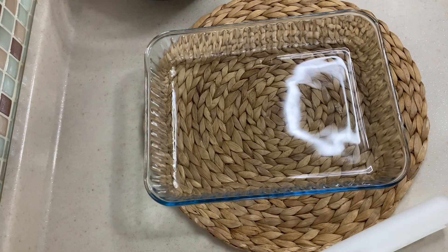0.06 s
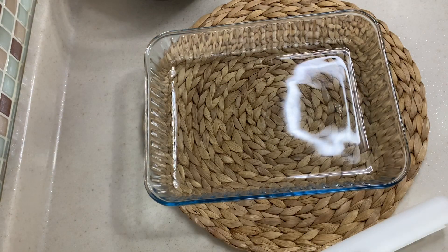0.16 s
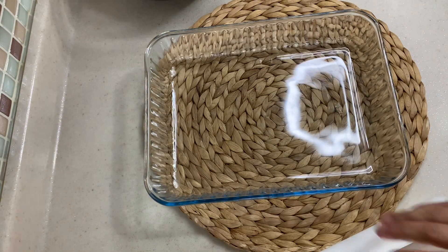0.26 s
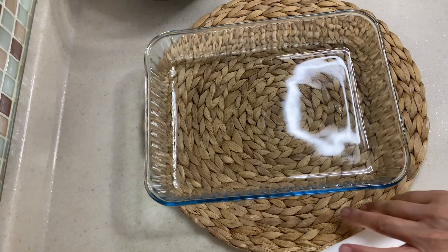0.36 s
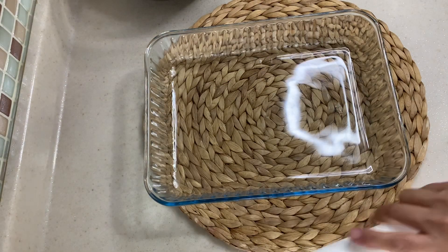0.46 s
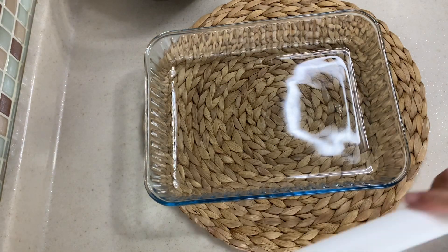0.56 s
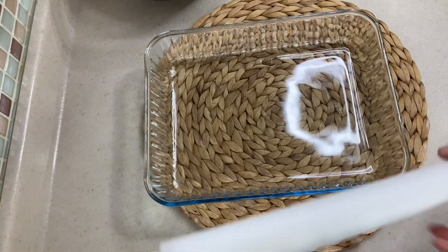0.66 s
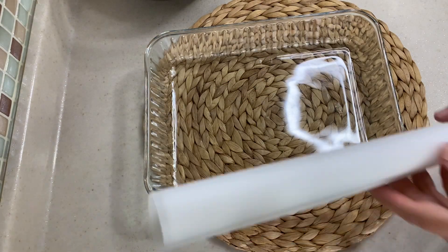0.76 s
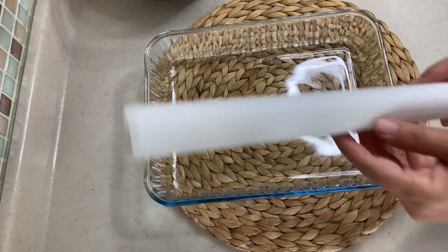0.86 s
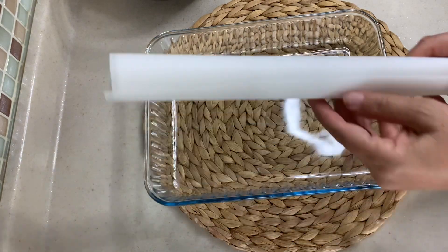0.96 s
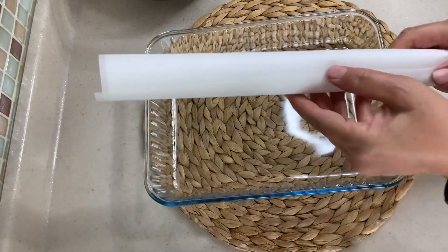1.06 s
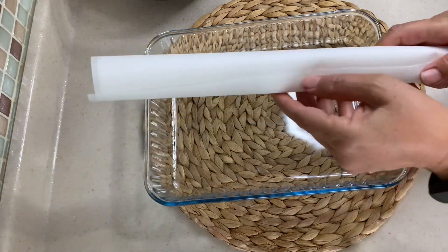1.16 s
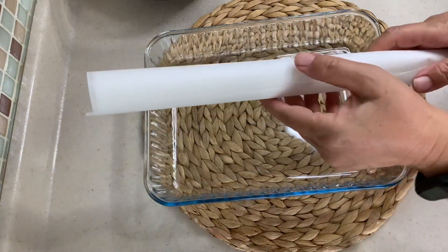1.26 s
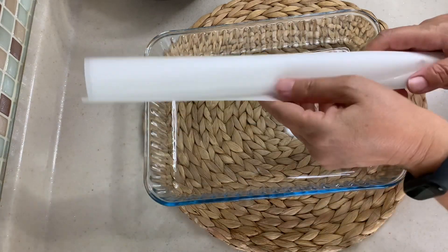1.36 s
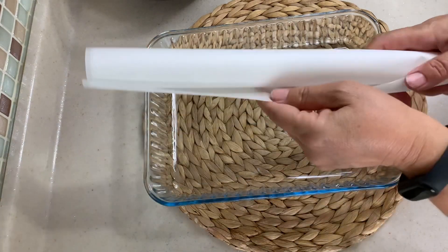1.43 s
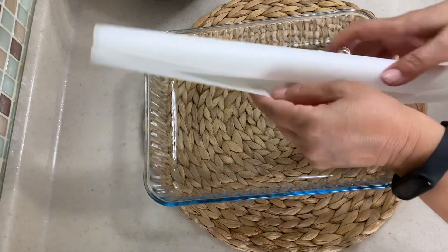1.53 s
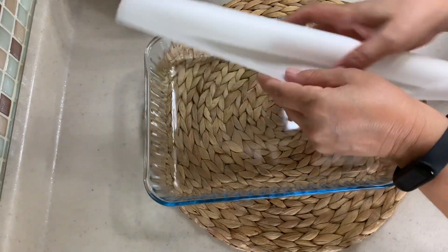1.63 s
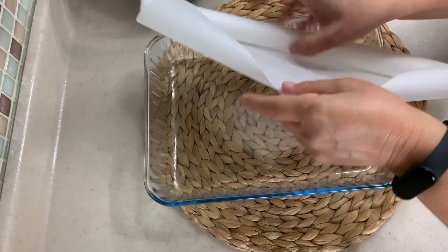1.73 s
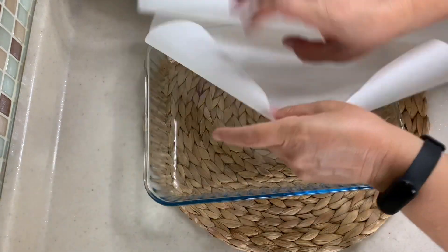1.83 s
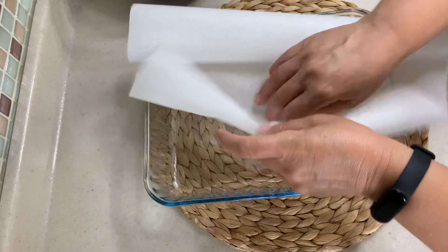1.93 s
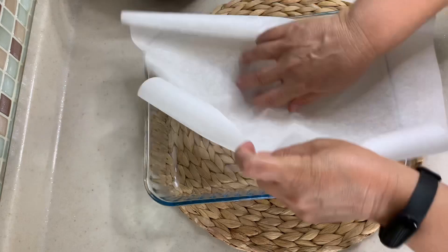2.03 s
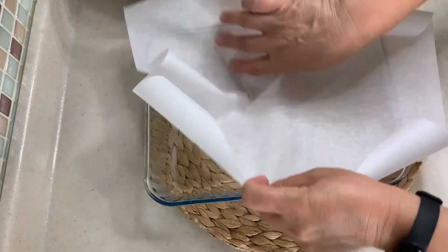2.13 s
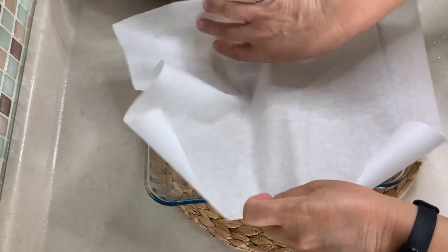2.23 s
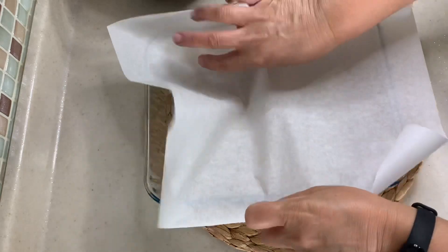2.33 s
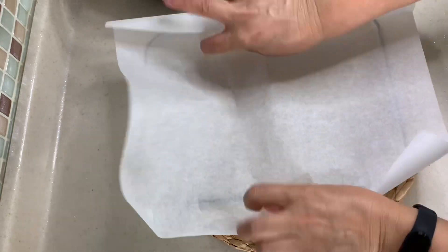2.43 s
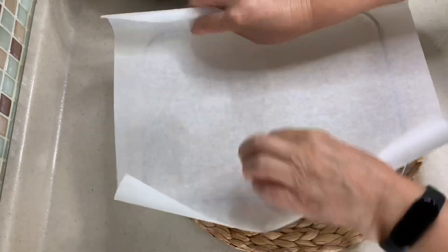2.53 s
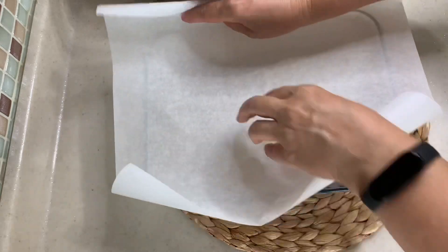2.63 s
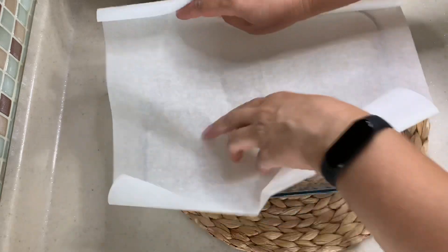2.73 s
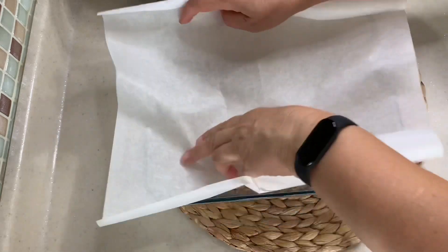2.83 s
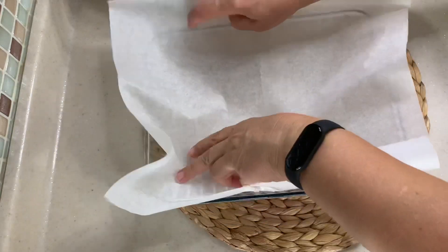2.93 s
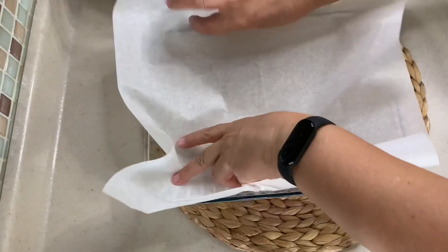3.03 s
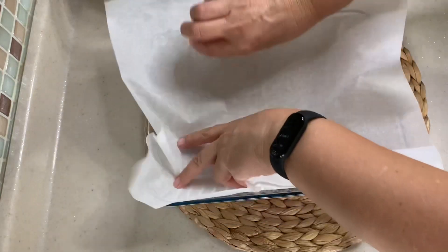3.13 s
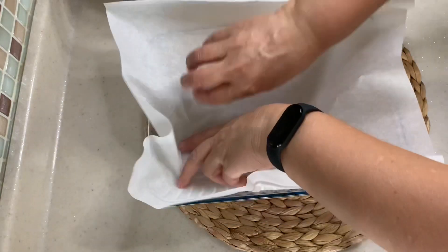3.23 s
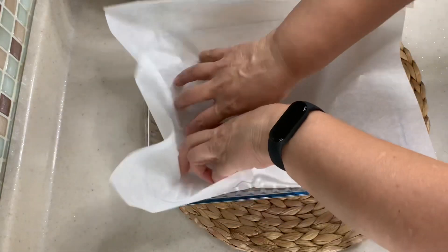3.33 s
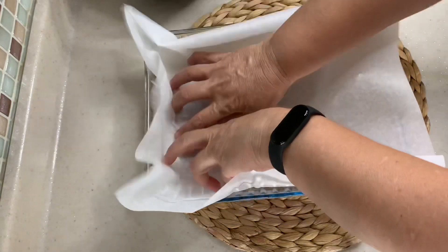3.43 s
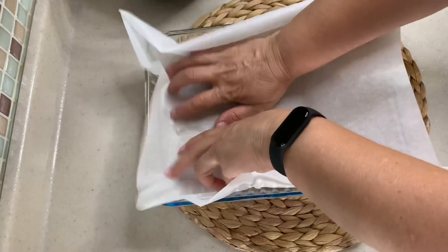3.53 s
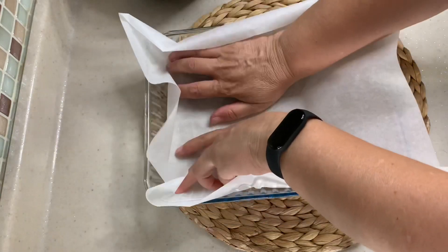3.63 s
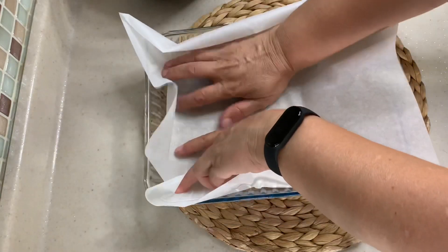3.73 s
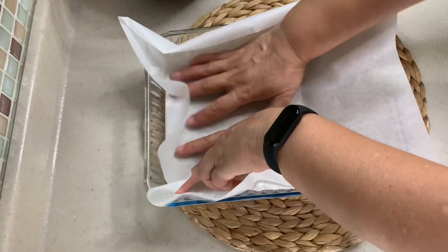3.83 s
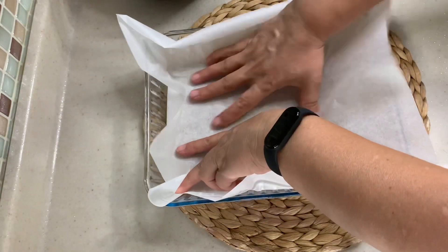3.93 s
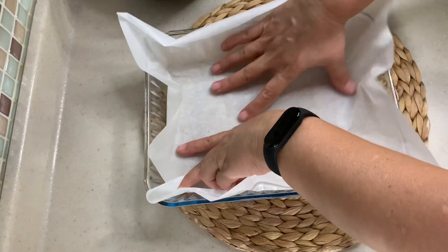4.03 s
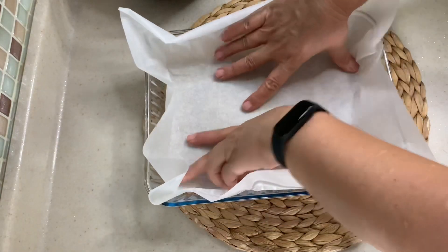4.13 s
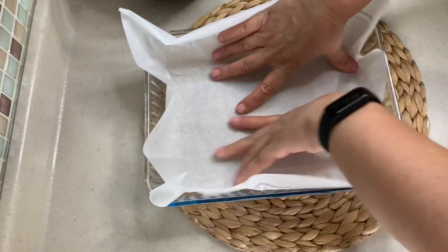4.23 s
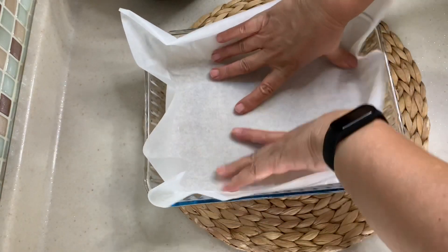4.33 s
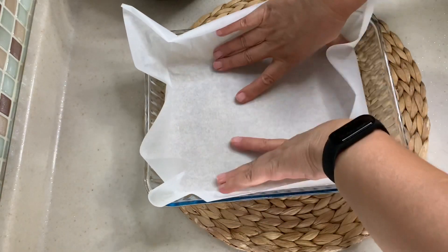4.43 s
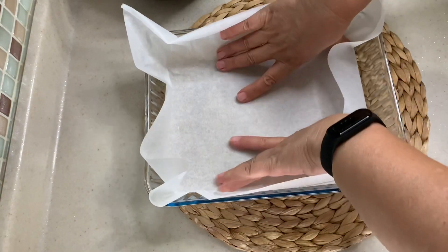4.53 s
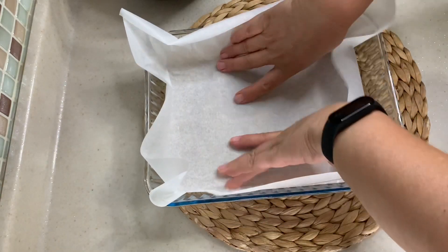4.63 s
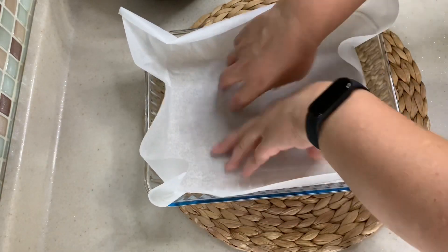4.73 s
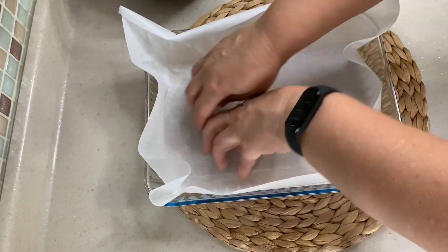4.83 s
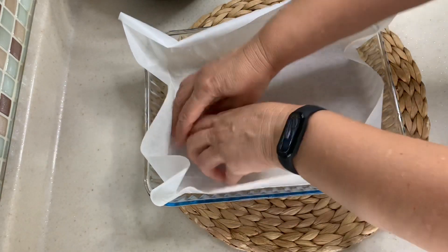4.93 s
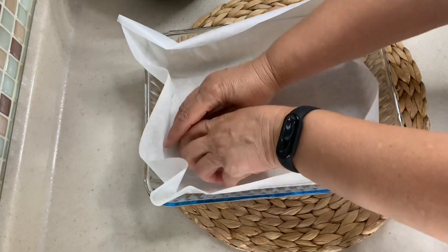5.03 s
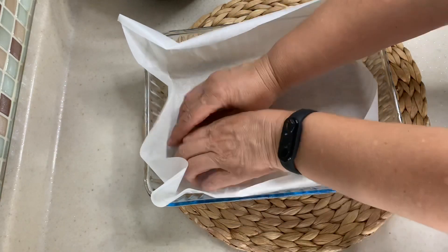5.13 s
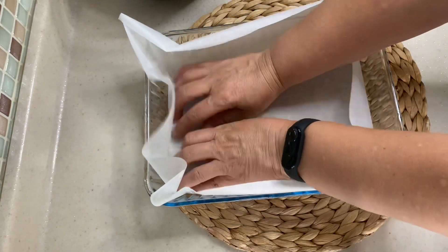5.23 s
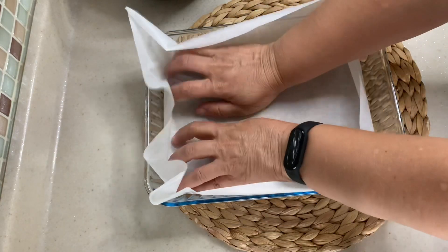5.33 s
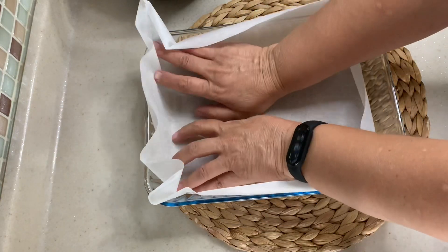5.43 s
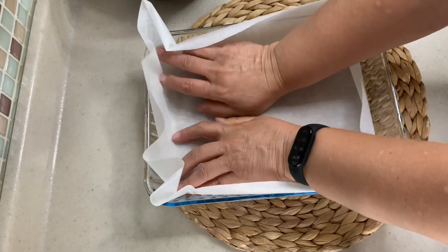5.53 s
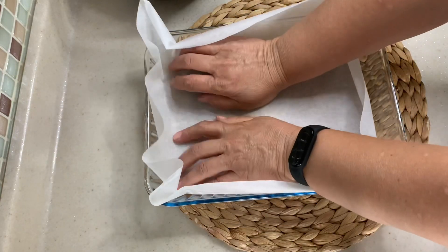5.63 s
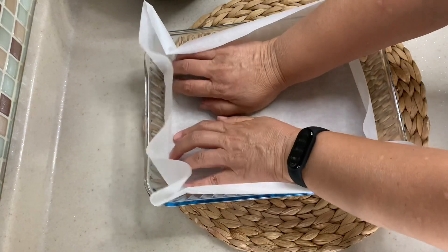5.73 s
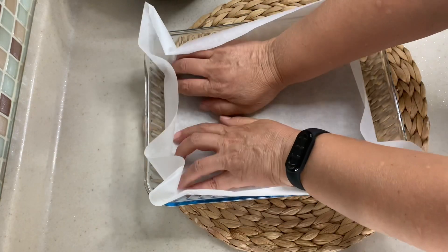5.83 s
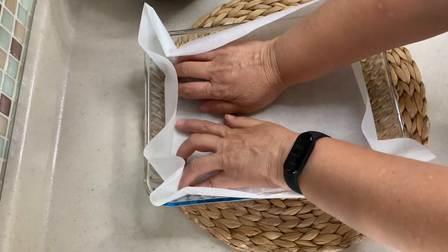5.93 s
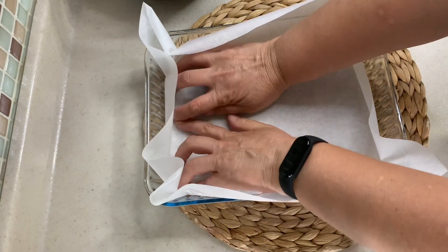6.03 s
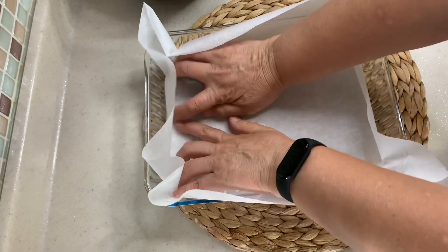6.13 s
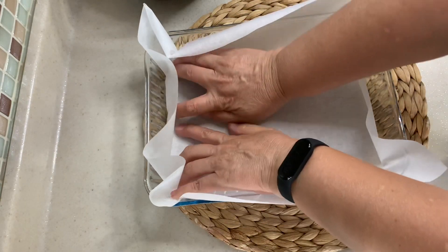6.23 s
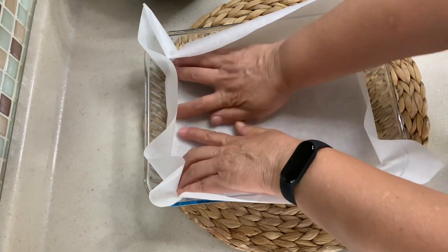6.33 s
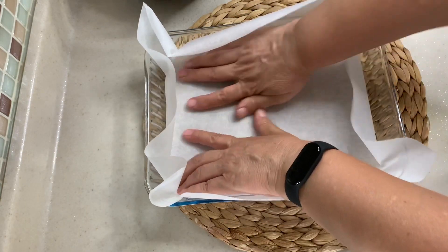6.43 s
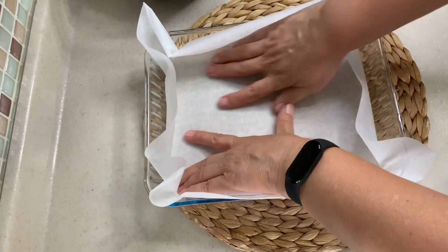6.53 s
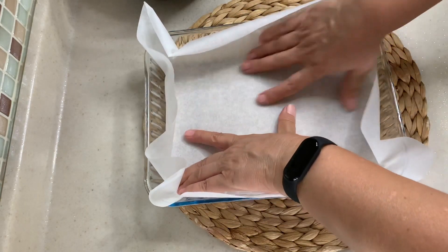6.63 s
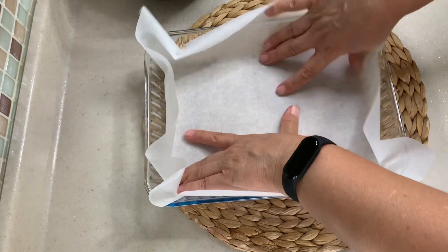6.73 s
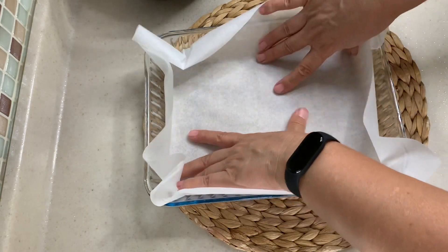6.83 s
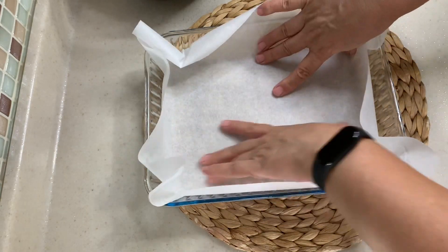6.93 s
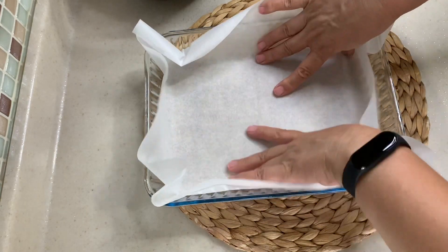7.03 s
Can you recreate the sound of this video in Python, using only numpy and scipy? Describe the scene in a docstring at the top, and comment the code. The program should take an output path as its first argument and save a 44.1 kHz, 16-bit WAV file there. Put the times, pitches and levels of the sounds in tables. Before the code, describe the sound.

Crisp paper crinkling, sharp crease snaps and soft smoothing rustles close up in a quiet kitchen, with a low steady hum behind.

```python
"""From the start an appliance hums in a quiet kitchen while hands hold a sheet of baking parchment.
From 0.4 s creases snap as bursts of noise and set facets ringing; a soft knuckle thud rings one low mode.
Then hands unroll the sheet and press it into a glass dish: noise bands rustle in clumped grains.
At 4.8 s a fingertip squeaks as a few short tones; more soft thuds follow from 6.2 s.
A pair of microphones listens from above, with close reflections around the sheet."""
import sys
import numpy as np
from scipy import signal
from scipy.fft import rfft, irfft
from scipy.io import wavfile

SR = 44100
rng = np.random.default_rng(int(sys.argv[2]) if len(sys.argv) > 2 else 0)


def dump_mix(stems):
    """Bounce the given channels to the path in sys.argv[1] as a 16-bit WAV at rate SR."""
    frames = np.atleast_2d(stems).T  # one column per channel
    limited = np.clip(frames, -1, 1)  # hard clip at full scale
    pcm = np.round(limited * 32767).astype(np.int16)
    wavfile.write(sys.argv[1], SR, pcm)


N = 312669   # length [samples]

EDGES = 85 * 2 ** np.arange(0, 7.8, 1 / 3)   # third-octave band edges [Hz]
CENTRES = np.sqrt(EDGES[1:] * EDGES[:-1])


def amp(db):
    """Turn decibels into an amplitude factor; amp(2 * db) is the power factor."""
    return 10 ** (np.asarray(db) / 20)


def rms_one(x):
    """Scale a signal to an rms of 1."""
    return x / np.sqrt(np.mean(x ** 2) + 1e-20)


def at_hz(hz, points, axis=1):
    """Read one column of a table between its frequencies, on a logarithmic scale."""
    points = np.array(points)
    return np.interp(np.log(hz), np.log(points[:, 0]), points[:, axis])


def at_time(t, points):
    """Read a two-column table between its times."""
    return np.interp(t, *np.transpose(points))


def drift(rate):
    """Slow random wandering of spread 1; a higher rate wanders faster."""
    r = np.exp(-80 * np.pi * rate / SR)
    chance = rng.standard_normal(N // 40 + 2002)
    slow = signal.lfilter([1], [1, -2 * r, r * r], chance)[2000:]   # one value per 40 samples
    return np.interp(np.arange(N) / 40, np.arange(len(slow)), rms_one(slow))


def fade(strikes, t60):
    """Each strike of power jumps up and dies away by 60 dB in t60 seconds."""
    return signal.lfilter([1], [1, -amp(-120 / (t60 * SR))], strikes + 1e-18)


def shares(spectrum):
    """Share of the power that each band carries."""
    power = amp(2 * at_hz(CENTRES, spectrum)) * np.diff(EDGES)
    return power / power.sum()


# colour of the room's steady noise: (frequency [Hz], relative level [dB])
ROOM_COLOUR = [(20, -44), (45, -11.5), (80, 4.5), (150, -0.5), (240, -10.5), (300, -6), (420, -11),
               (570, -13.5), (680, -9.5), (860, -12), (1200, -19), (2500, -31), (5000, -55), (8000, -50),
               (16000, -50)]
# narrow bands of the hum: (centre [Hz], half-width [Hz], level [dB])
HUM_BANDS = [(103.6, 2.9, -62), (127, 8.6, -54.5), (199.4, 11, -60.5), (63.6, 10, -60.5), (550, 20, -59)]
# main tone of the hum: (time [s], level [dB])
HUM_TONE_LEVEL = [(0, -45.5), (1.7, -45.5), (2.2, -48.5), (2.8, -44.5), (4.2, -51), (5.2, -46.5),
                  (7.09, -46.5)]
ROOM_TONE_DB, HUM_TONE_HZ = -52, 99.8


def background():
    """Coloured room noise plus an appliance's hum: narrow wavering noise bands and one steady-pitched tone."""
    hz = np.fft.rfftfreq(N, 1 / SR) + 1
    t = np.arange(N) / SR

    def noise(gain):
        """Two unrelated noises coloured by a gain per frequency."""
        return rms_one(irfft(rfft(rng.standard_normal((2, N))) * gain, N))

    out = amp(ROOM_TONE_DB + 2.2 * drift(13.0)) * noise(amp(at_hz(hz, ROOM_COLOUR)))
    for centre_hz, width, db in HUM_BANDS:
        out += amp(db) * noise(1 / (1 + ((hz - centre_hz) / width) ** 2))
    tone = np.sqrt(2) * np.sin(2 * np.pi * HUM_TONE_HZ * t)
    return out + amp(at_time(t, HUM_TONE_LEVEL)) * tone * [[1], [0]]


# rustle of the held sheet between moves:
# (time [s], flexing sheet level [dB], crackling crease level [dB])
HELD_SHEET = [(0.0, -57, -93), (0.33, -90, -110), (0.38, -58, -71), (0.7, -55.5, -47), (1.0, -53.5, -42.5),
              (1.2, -56.5, -57), (1.29, -76, -73), (1.42, -45.5, -40), (1.87, -39, -40),
              (2.1, -30.5, -28.5), (2.35, -35.5, -40), (2.7, -36.5, -39.5), (2.998, -30.5, -34),
              (3.25, -38.5, -37), (3.549, -36, -25), (3.67, -50.5, -54), (3.9, -32.5, -27),
              (4.27, -39.5, -38.5), (4.4, -40, -53), (4.55, -50.5, -46.5), (5.07, -48, -40),
              (5.4, -49, -31.5), (5.6, -44, -33), (5.85, -39.5, -33), (6.1, -42, -32), (6.26, -49.5, -42),
              (6.5, -39, -30.5), (6.89, -41.5, -37.5), (7.09, -41.5, -34)]
# moves that lift, unroll, press and smooth:
# (start [s], length [s], flexing sheet level [dB], crackling crease level [dB], rise [dB/s])
HAND_MOVES = [(0.376, 0.04, -50, -45.5, 2500), (0.427, 0.034, -44, -38, 408),
               (1.141, 0.064, -52.5, -42, 600), (1.368, 0.021, -41, -34, 226),
              (1.486, 0.0083, -32, -31, 300), (1.69, 0.028, -28, -21, 291), (1.791, 0.027, -28.5, -25, 200),
              (1.904, 0.012, -19, -19.5, 2500), (1.957, 0.08, -23, -17, 300),
              (2.414, 0.013, -24, -27.5, 500), (2.5, 0.072, -30.5, -32, 198), (2.754, 0.031, -25, -23, 298),
              (2.866, 0.046, -30.5, -24, 300), (2.939, 0.022, -27, -25, 300),
              (3.035, 0.093, -30.5, -28.5, 1500), (3.304, 0.043, -26.5, -24, 2500),
              (3.418, 0.035, -31.5, -21.5, 300), (3.544, 0.029, -30.5, -24, 300),
              (3.714, 0.13, -33, -24.5, 500), (3.926, 0.11, -28.5, -21.5, 2500),
              (4.152, 0.015, -51, -29, 300), (4.208, 0.023, -31.5, -18, 2498),
              (4.31, 0.069, -31, -21, 2500), (4.619, 0.035, -45, -35, 300), (4.837, 0.037, -44, -36, 393),
              (4.918, 0.083, -40, -32, 1493), (5.14, 0.013, -37, -33, 500), (5.234, 0.063, -29, -21, 214),
              (5.341, 0.065, -32.5, -25, 300), (5.454, 0.12, -38, -32, 1498), (5.684, 0.12, -38, -47, 2000),
              (5.899, 0.09, -37.5, -38, 402), (6.134, 0.013, -34.5, -27, 2500),
              (6.375, 0.063, -37.5, -38, 2500), (6.652, 0.021, -31, -22, 298),
              (6.727, 0.037, -29.5, -19.5, 500), (7.027, 0.07, -41, -36, 500)]
FALL_DB_PER_S = 277


def handling():
    """Power of sheet and creases: each move rises, holds and falls away over the rustle of the held sheet."""
    t = np.arange(0, N, 32) / SR
    s, *levels = np.transpose(HELD_SHEET)
    power = amp(2 * np.array([np.interp(t, s, db) for db in levels]))
    for start, length, *db, rise in HAND_MOVES:
        rising = rise * (start - t)
        falling = FALL_DB_PER_S * (t - start - length)
        below_db = np.maximum(0, np.maximum(rising, falling))
        power = power + amp(2 * (np.array(db)[:, None] - below_db))
    return [np.interp(np.arange(N) / SR, t, row) for row in power]


GRAIN_SPREAD_DB = 3.0   # how uneven the grains are


def grains(per_s):
    """Power strikes of uneven micro-buckles that come in clumps, because their rate wanders."""
    born = rng.random(N) < per_s * amp(4 * drift(20)) / SR
    return born * amp(2 * GRAIN_SPREAD_DB * np.minimum(rng.exponential(1, N), 4))


# colour of the flexing sheet: (frequency [Hz], relative level per Hz [dB])
SHEET_COLOUR = [(120, -23), (190, -5.5), (240, -17.5), (340, 0), (480, -13), (600, -4.5), (760, -3),
                (1100, -3), (2000, -1.5), (3200, -2.5), (5000, -7.5), (8000, -15)]
# colour of the crackling creases: (frequency [Hz], relative level per Hz [dB])
CREASE_COLOUR = [(1200, -25), (2500, -7.5), (3500, -3.5), (5000, -4), (6500, -2.5), (8500, 6),
                 (11000, -0.5), (13500, 6.5), (16000, 2.5)]
GRAINS_PER_S = 550      # before the rate wanders
GRAIN_T60_S = 0.006     # shortest die-away; lower bands last longer
SMOOTH_SHARE = 0.4      # even hiss under the grains


def paper():
    """Unrelated noises in both rows, split in bands, follow the power of rustle, grains and snaps."""
    sheet, crease = handling()
    # fine grains ride on sparser, longer crackles that start sharply
    shared, clumps = grains(GRAINS_PER_S), fade(grains(90), 0.2)
    crackle = 1.0 + clumps / clumps.mean()
    gust = drift(33.0)      # all bands swell together
    white = rng.standard_normal((2, 2, N))   # two noises, each with two rows
    bursts, out = snaps()
    sheet_shares, crease_shares = shares(SHEET_COLOUR), shares(CREASE_COLOUR)
    for k, (burst, hz) in enumerate(zip(bursts, CENTRES)):
        strikes = shared + 0.63 * grains(GRAINS_PER_S)
        grain = fade(strikes, GRAIN_T60_S * (1 + 1200 / hz))
        swell = amp(2 * (2.15 * drift(11.7) + 0.78 * gust))
        flutter = (SMOOTH_SHARE + grain / grain.mean()) * crackle * swell
        level = sheet * sheet_shares[k] + crease * crease_shares[k]
        rustle = level * flutter / flutter.mean()
        band_filter = signal.butter(2, EDGES[k:k + 2], "band", fs=SR, output="sos")
        band = signal.sosfilt(band_filter, white[k % 2])   # neighbouring bands use different noises
        out = out + rms_one(band) * np.sqrt(rustle + burst)
    return out + facets(sheet, crease)


FACET_CYCLES = 20       # a facet rings down by 60 dB in this many cycles
FACET_WANDER_DB = 4     # facets come and go as the sheet folds


def facets(sheet, crease):
    """Small flat patches between creases pop at random and ring briefly, each at its own pitch and place."""
    pops, dealt = np.sqrt(grains(1500)), rng.integers(0, 24, N)
    places, out = rng.standard_normal((2, N)), 0
    pitches = np.geomspace(450, 5000, 24) * amp(0.2 * rng.standard_normal(24))
    for k, hz in enumerate(pitches):
        r, w = amp(-60 * hz / (FACET_CYCLES * SR)), 2 * np.pi * hz / SR
        strikes = pops * places * (dealt == k) + 1e-18
        ring = signal.lfilter([0, 1], [1, -2 * r * np.cos(w), r * r], strikes)
        sheet_part = np.interp(hz, CENTRES, shares(SHEET_COLOUR)) * sheet
        crease_part = np.interp(hz, CENTRES, shares(CREASE_COLOUR)) * crease
        wandering = rms_one(ring * amp(FACET_WANDER_DB * drift(2.8)))
        out = out + wandering * np.sqrt(sheet_part + crease_part)
    return amp(-13.5) * out


# the clearest single snaps: (time [s], crease level [dB], facet pitch [Hz], facet level [dB])
CREASE_SNAPS = [(0.3745, -44, 2180, -38), (0.434, -25, 2500, -42), (0.512, -29, 1940, -39),
                (0.7898, -14.5, 860, -35), (0.817, -21, 1190, -34), (0.8237, -14.5, 1970, -28),
                (1.159, -37, 910, -37), (1.369, -35, 920, -27.5), (1.437, -17.5, 3440, -31),
                (1.4823, -19, 547, -31.5), (1.4912, -14.5, 1470, -20.5), (1.654, -12, 4050, -28),
                (1.6694, -16, 2320, -19), (1.6986, -1.5, 3850, -19), (1.705, -9, 2960, -32),
                (1.905, -3.5, 3060, -11), (1.9118, -4, 2700, -6.5), (1.963, -15, 2290, -8),
                (2.045, -12, 2070, -20), (2.177, -17, 2370, -14.5), (2.2755, -27, 2200, -21),
                (2.3708, -17.5, 1890, -16), (2.399, -17, 1860, -27), (2.413, -5.5, 1830, -13.5),
                (2.5261, -17, 2460, -13), (2.5664, -19, 700, -24.5), (2.7035, -40, 1950, -23),
                (2.7172, -9, 2060, -13.5), (2.8044, -11, 1420, -17), (2.889, -22, 1120, -19),
                (2.9345, -12.5, 887, -18), (2.948, -26, 1910, -16), (3.023, -10, 4560, -35),
                (3.039, -15, 3320, -17), (3.069, -12.5, 3700, -15), (3.123, -9.5, 3500, -9),
                (3.282, -16, 2800, -29), (3.3098, -6, 1300, -19), (3.3223, -10, 1700, -14),
                (3.3517, -6, 1990, -20), (3.359, -8, 1890, -31), (3.373, -9, 2000, -22),
                (3.3838, -3.5, 2060, -18), (3.389, -14, 2430, -26), (3.4356, -13, 790, -28),
                (3.4415, -23, 3630, -31), (3.51, -13.5, 2900, -35), (3.5236, -23, 1310, -28),
                (3.542, -3, 3980, -32), (3.548, -5.5, 3620, -14), (3.7, -26, 2330, -39),
                (3.735, -12, 2280, -18), (3.807, -13, 4480, -31), (3.868, -11.5, 3340, -30),
                (3.9043, -19, 2470, -24), (3.931, -12, 1500, -14.5), (3.987, -4.5, 1830, -11.5),
                (4.004, -6.5, 2470, -13), (4.013, -6.5, 2690, -17), (4.024, -26, 4970, -23),
                (4.17, -23, 4900, -17), (4.21, -18, 2430, -9.5), (4.2939, -4.5, 2700, -20),
                (4.3283, -2.5, 2590, -4), (4.378, -8.5, 3360, -31), (4.5078, -22, 2250, -26),
                (4.557, -26, 2000, -26), (4.5762, -20.5, 1540, -31), (4.611, -23, 1540, -34),
                (4.631, -31, 2930, -23.5), (4.651, -33, 750, -37), (4.696, -23, 1500, -37),
                (4.706, -26, 1200, -37), (4.808, -42, 775, -30), (4.855, -17.5, 2165, -25),
                (4.861, -12.5, 2180, -28), (4.9418, -11.5, 1150, -22.5), (4.998, -23, 1110, -32),
                (5.007, -14.5, 1140, -26), (5.1186, -17.5, 1230, -40), (5.144, -16, 3120, -41),
                (5.177, -18, 4600, -19), (5.245, -3, 1220, -18), (5.2643, -2, 2900, -31),
                (5.2792, -4, 2190, -19), (5.31, -18, 1500, -24), (5.39, -10, 3780, -44),
                (5.445, -9, 1300, -28), (5.4505, -15, 1140, -22.5), (5.4813, -14, 2300, -43),
                (5.504, -7, 2480, -37), (5.509, -9, 4550, -40), (5.6098, -15.5, 1390, -35),
                (5.677, -8, 1110, -25), (5.6885, -10.5, 950, -32), (5.711, -9.5, 1040, -24),
                (5.7452, -16, 1980, -24), (5.751, -15, 1080, -20), (5.7635, -15.5, 2540, -19),
                (5.8021, -12, 3630, -7.5), (5.8392, -12, 3600, -17), (5.923, -13, 580, -32),
                (5.9545, -13, 3630, -36), (5.9681, -7, 3550, -43), (6.062, -17, 590, -47),
                (6.1348, -9.5, 4610, -29), (6.1465, -3, 2140, -17), (6.267, -17.5, 1460, -32),
                (6.382, -9, 4400, -10.5), (6.411, -19, 3480, -26), (6.439, -16, 3620, -22),
                (6.493, -10.5, 1800, -20), (6.56, -21, 1180, -27.5), (6.595, -11.5, 1150, -27),
                (6.625, -16, 2580, -34), (6.653, -9, 1100, -18.5), (6.6766, -9, 3600, -16),
                (6.7073, -11, 670, -36), (6.728, -9.5, 2160, -18), (6.7478, -7, 2540, -31),
                (6.76, -22, 750, -30), (6.773, -14, 1500, -25), (6.983, -9, 3600, -36),
                (7.0488, -8, 2900, -8), (7.0839, -12, 2000, -20)]
# snaps change in length as the sheet lies down in the dish:
# (time [s], 60 dB die-away [s], stretched further in the lower bands)
SNAP_DIE_AWAY = [(0, 0.012), (3.2, 0.023), (5.3, 0.015), (5.5, 0.013), (7.09, 0.019)]
SNAP_RISE_S, SNAP_COLOUR_DB = 0.003, 2.5   # the second makes the colour uneven
TICK_SHARE, TICK_RISE_S, TICK_T60_S = 0.7, 0.0007, 0.005   # die-away is stretched in the same way
FACET_TWIN, FACET_TWIN_DB = 0.6, 1.5   # strength of two nearby modes; spread of their pitch ratio


def snaps():
    """A crease gives way with a burst of uneven colour (power per band) and sets one facet ringing."""
    power, rings = np.zeros((len(CENTRES), N)), np.zeros((2, N))
    chance = rng.standard_normal((len(CREASE_SNAPS), len(CENTRES) + 3))
    t = np.arange(int(.06 * SR)) / SR
    longer = 1 + 700 / CENTRES[:, None]      # lows die more slowly
    for (s, crease_db, hz, facet_db), (place, warp, other, *colour) in zip(CREASE_SNAPS, chance):
        i = round(s * SR)
        start = amp(2 * SNAP_COLOUR_DB * np.array(colour)) * shares(CREASE_COLOUR)
        t60 = at_time(s, SNAP_DIE_AWAY) * longer
        body = np.minimum(t / SNAP_RISE_S, 1) * amp(-120 * t / t60)
        # the dry tick at its front
        tick = np.minimum(t / TICK_RISE_S, 1) * amp(-120 * t / (TICK_T60_S * longer))
        burst = start[:, None] * (body + TICK_SHARE * tick)
        power[:, i:i + len(t)] += amp(2 * crease_db) / start.sum() * burst[:, :N - i]
        # an uneven facet has two more modes nearby
        twin_hz = hz * amp(FACET_TWIN_DB * np.c_[[warp, other]])
        twins = np.sin(2 * np.pi * twin_hz * t).sum(axis=0)
        modes = np.sin(2 * np.pi * hz * t) + FACET_TWIN * twins
        ring = np.minimum(t * hz / 1.74, 1) * amp(facet_db - 60 * t * hz / FACET_CYCLES) * modes
        rings[:, i:i + len(t)] += np.outer([1, 0.99 * place], ring)[:, :N - i]
    return power, rings


ROOM_T60_S, ROOM_DB = 0.091, -11


def kitchen(x):
    """Close reflections from dish, counter and tiles: a short dying noise, duller than the sound."""
    t = np.arange(int(.3 * SR)) / SR
    dull = signal.lfilter([1], [1, -.4], rng.standard_normal((2, len(t))))
    tail = dull * amp(-60 * t / ROOM_T60_S) * (t > .002)
    tail = tail / np.sqrt((tail ** 2).sum() / 2)
    return amp(ROOM_DB) * signal.fftconvolve(x, tail, axes=1)[:, :N]


# a hand touches the counter or dish: (time [s], level [dB])
HAND_THUDS = [(0.377, -30.5), (6.155, -42), (6.668, -37), (6.809, -36), (6.931, -37)]
THUD_HZ, THUD_T60_S = 72, 0.3


def thuds():
    """Soft blows ring one low mode of the counter."""
    clicks = np.zeros(N)
    for s, db in HAND_THUDS:
        clicks[round(s * SR)] = amp(db)
    t = np.arange(int(.4 * SR)) / SR
    envelope = np.minimum(t / 0.014, 1) * amp(-60 * t / THUD_T60_S)
    ring = envelope * np.sin(2 * np.pi * THUD_HZ * t)
    return signal.fftconvolve(clicks, ring)[:N]


# tones of the fingertip's squeak: (frequency [Hz], level [dB])
SQUEAK_PARTIALS = [(770, -54), (1200, -56), (2300, -45.5)]
SQUEAK_START_S, SQUEAK_LENGTH_S = 4.765, 0.043


def squeak():
    """A fingertip sticks and slips on the sheet: a short, slightly unsteady mix of tones."""
    t = np.arange(N) / SR - SQUEAK_START_S
    gate = np.clip(np.minimum(t / 0.0051, (SQUEAK_LENGTH_S - t) / .01), 0, 1)
    bent = t + 0.00004 * drift(40)      # wandering time makes the pitch unsteady
    tones = sum(amp(db) * np.sqrt(2) * np.sin(2 * np.pi * hz * bent) for hz, db in SQUEAK_PARTIALS)
    return gate * tones


def scene():
    """Row 0 is what both microphones share, row 1 what differs between them."""
    sheet = paper() + squeak() * [[1], [.5]]
    return sheet + kitchen(sheet) + background() + thuds() * [[1], [.2]]


# microphone pair: (frequency [Hz], left-right likeness [-1 to 1], left over right [dB])
MICROPHONE_PAIR = [(60, 1, 1), (200, 0.8, -1), (695, 0.18, 1.5), (1500, 0.4, 1.5), (3080, 0.017, 0),
                   (6000, 0.0081, -4.5), (6370, 0.84, -2), (7750, 1, 0), (16100, 1, 0)]
LEAD_S, IN_STEP_HZ, LEAD_FROM_HZ = .0002, 11000, 6000
CUTOFF_HZ = 15850


def record(dry):
    """The pair mixes by likeness; in the treble the right port hears the same sound a little early."""
    hz = np.fft.rfftfreq(N, 1 / SR) + 1
    common, apart = rfft(dry)
    alike = np.clip(at_hz(hz, MICROPHONE_PAIR), -1, 1)
    mid, side = np.sqrt((1 + alike) / 2) * common, np.sqrt((1 - alike) / 2) * apart
    lean = amp(at_hz(hz, MICROPHONE_PAIR, axis=2) / 2)
    lead = np.exp(2j * np.pi * LEAD_S * (np.maximum(hz, LEAD_FROM_HZ) - IN_STEP_HZ))
    pair = irfft(np.array([(mid + side) * lean, (mid - side) * lead / lean]), N)
    rounded = .8 * np.tanh(pair / .8)      # the loudest peaks are squeezed
    # stopband, 70 dB down, begins just above the cutoff
    lowpass = signal.cheby2(16, 70, CUTOFF_HZ + 250, fs=SR, output="sos")
    return signal.sosfilt(lowpass, rounded)


dry = scene()
out = record(dry)
dump_mix(out)
```